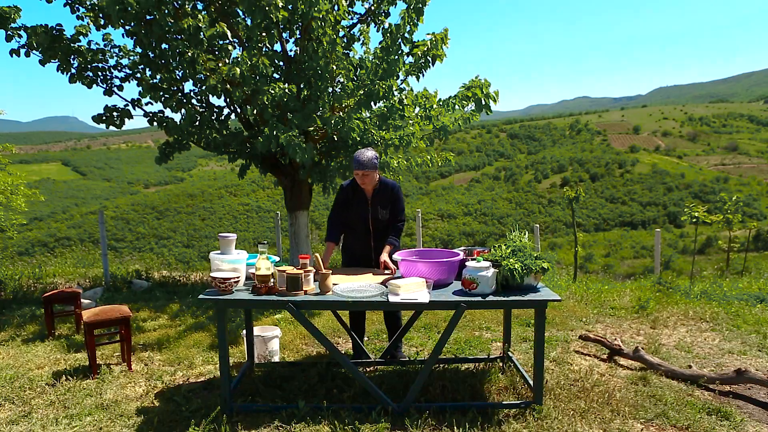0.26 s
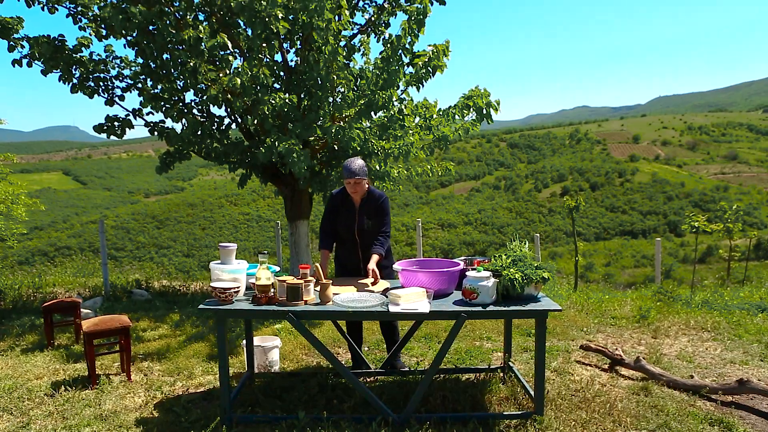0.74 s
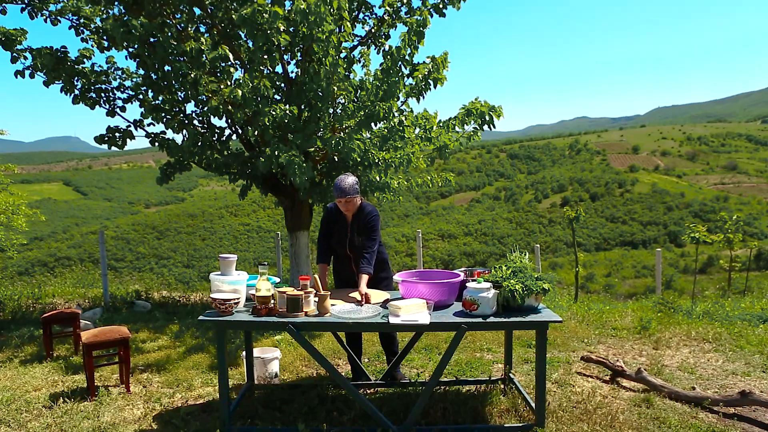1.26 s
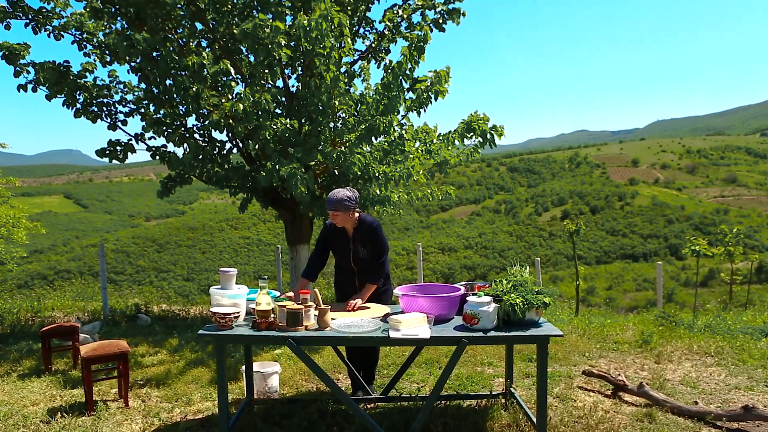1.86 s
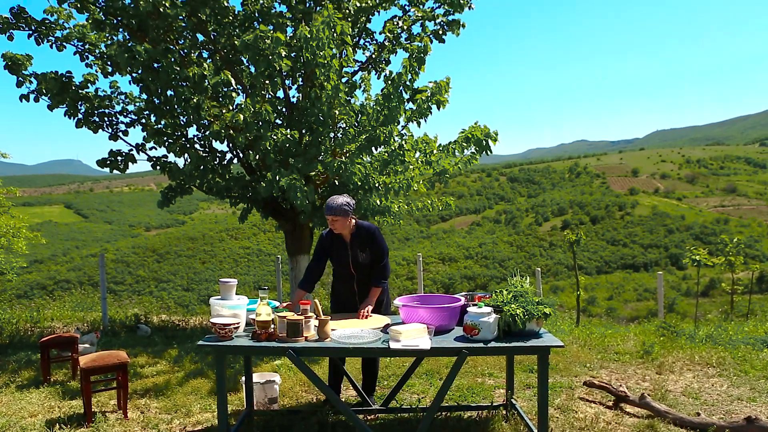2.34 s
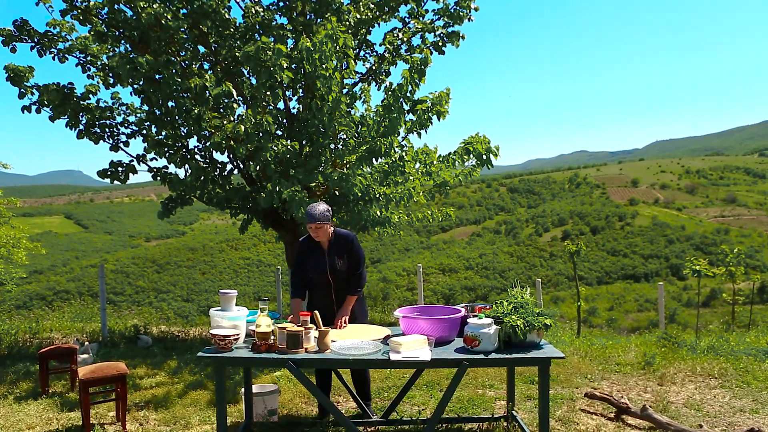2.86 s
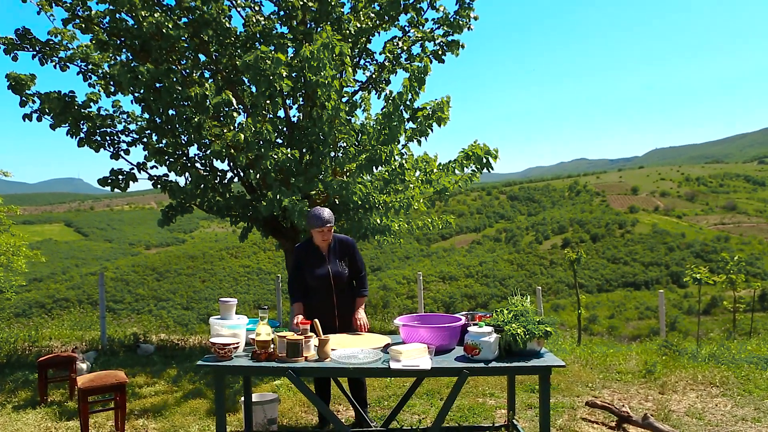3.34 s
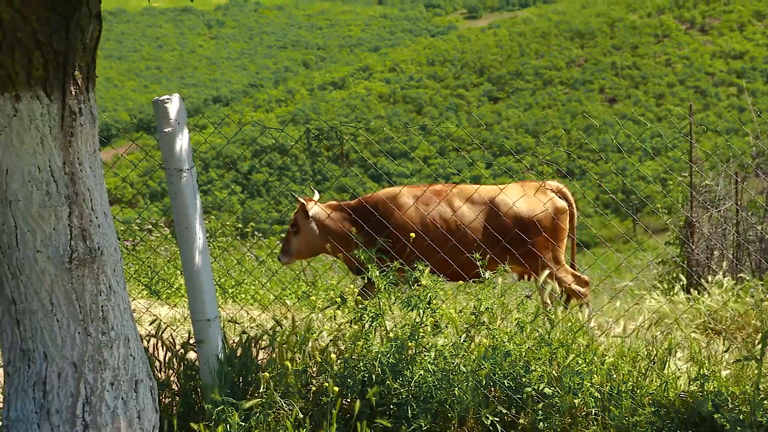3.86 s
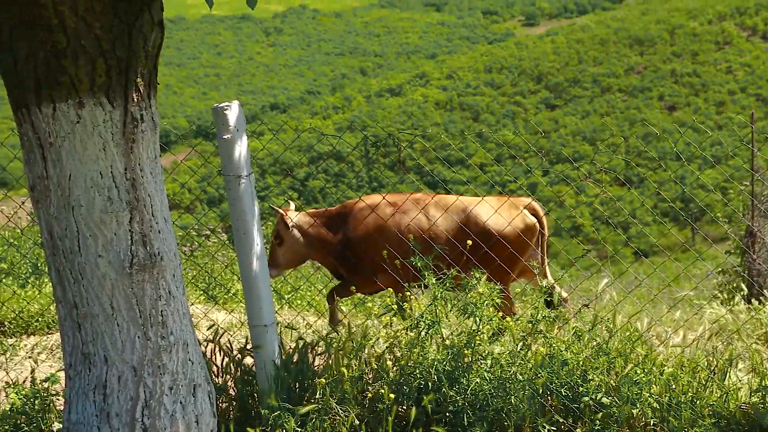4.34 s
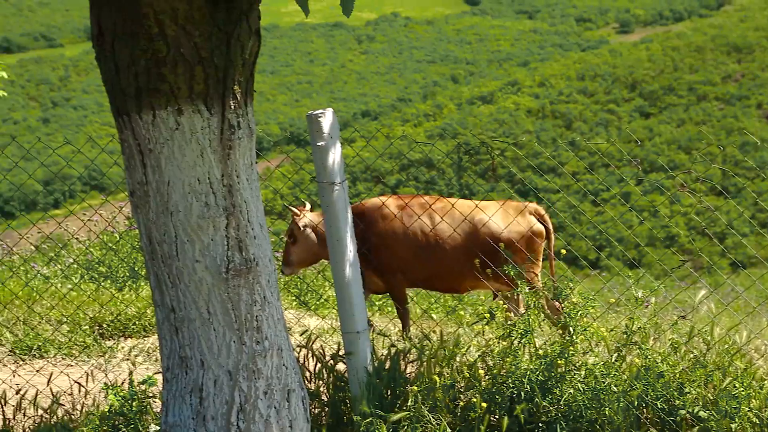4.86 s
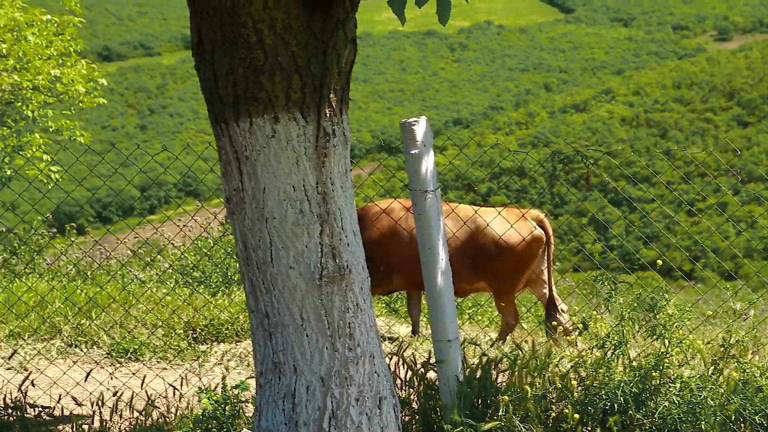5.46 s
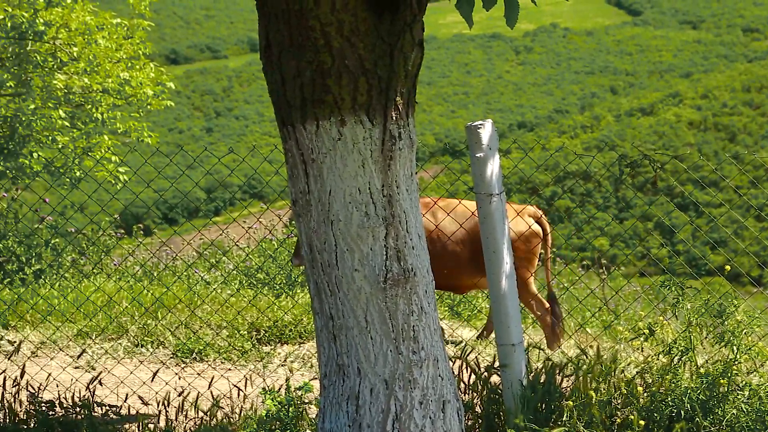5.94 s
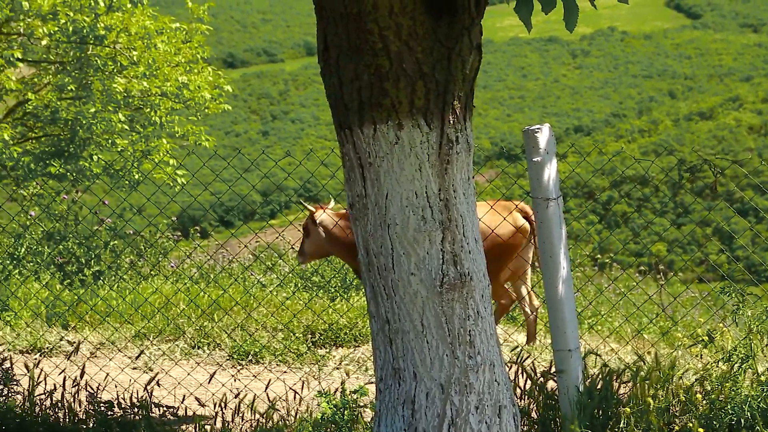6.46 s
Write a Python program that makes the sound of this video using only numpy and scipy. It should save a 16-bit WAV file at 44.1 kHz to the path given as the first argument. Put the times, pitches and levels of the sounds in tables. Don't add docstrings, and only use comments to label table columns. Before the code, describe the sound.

Strong wind buffets the microphone at first, thudding, crackling and popping, peaking just after two seconds. Beneath it are brief bird calls on the right, pulsing crickets, light table handling and two tiny water drips. As the air stills, left-hand whistles, quick warbled notes, thin high sweeps off leaves, a drifting bee and faint distant engine rumble emerge over soft valley hiss, with little echo in the open yard.

```python
import sys
import numpy as np
from scipy import signal
from scipy.fft import rfft, irfft, next_fast_len
from scipy.io import wavfile
from scipy.ndimage import uniform_filter1d, map_coordinates

SR = 44100
rng = np.random.default_rng(int(sys.argv[2]) if len(sys.argv) > 2 else 0)


def unload_audio(sound):
    columns = np.transpose(np.atleast_2d(sound))
    steps = np.round(np.clip(columns, -1, 1) * 32767)
    wavfile.write(sys.argv[1], SR, steps.astype(np.int16))


def invert_db(level):
    return 10 ** (np.asarray(level, dtype=float) / 20)


N = 295470

# pitch_hz [Hz], density_db [dB per Hz]
FLUTTER_SPECTRUM = [(120, -91), (220, 4), (350, -1), (600, -16), (1000, -32), (2000, -72)]


def unit(x):
    return x / np.sqrt(np.mean(x ** 2) + 1e-20)


def along(points, hz):
    f, v = np.transpose(points)
    return np.interp(np.log(hz + 1), np.log(f + 1), v)


def curves(rows):
    s, *cols = np.transpose(rows)
    return [np.interp(np.arange(N) / SR, s, c) for c in cols]


def wobble(rate):
    knots = rng.standard_normal(int(N * rate / SR) + 4)
    return map_coordinates(knots, [np.arange(N) * rate / SR])


def swells(rows, rise_db_s, fall_db_s):
    t = np.arange(N) / SR
    levels = []
    for s, hold, db in rows:
        before, after = np.maximum(s - t, 0), np.maximum(t - s - hold, 0)
        levels.append(db - rise_db_s * before - fall_db_s * after)
    return np.max(levels, axis=0)


def rush(spectrum, alike, lumps=1):
    m = next_fast_len(N + SR // 2)
    hz = np.fft.rfftfreq(m, 1 / SR)
    turn = np.arccos(np.clip(along(alike, hz), -1, 1)) / 2
    shape = invert_db(along(spectrum, hz)) * [np.cos(turn), np.sin(turn)]
    white = lumps * rng.standard_normal((2, N))
    mid, side = irfft(rfft(white, m) * shape, m)[:, :N]
    return unit(np.array([mid + side, mid - side]))


def placed(x, lead, pan_db, wet_db):
    # pitch_hz [Hz], t60_s [s]
    yard = [(1000, 0.2), (3000, 0.16), (7000, 0.14), (13000, 0.14)]
    m = next_fast_len(N + 64)
    ramp = np.exp(1j * np.pi * np.fft.rfftfreq(m) * lead * np.array([[1], [-1]]))
    direct = irfft(rfft(x, m) * ramp, m)[:, :N] * invert_db([[pan_db / 2], [-pan_db / 2]])
    hz, t, z = signal.stft(rng.standard_normal((2, SR // 2)), SR, nperseg=256)
    t60 = along(yard, hz)[:, None]
    trees = invert_db(-60 * t / t60)
    hillside = invert_db(-21 - 60 * t / (4.5 * t60))
    trunks = invert_db(1.6 * rng.standard_normal((2, 1, len(t))))
    tail = signal.istft(z * (trees + hillside) * trunks, SR, nperseg=256)[1]
    echoes = signal.fftconvolve(x[None], tail / np.linalg.norm(tail[0]), axes=1)[:, :N]
    return direct + invert_db(wet_db) * echoes


def gusts():
    # start_s [s], hold_s [s], level_db [dB]
    blows = [(0, 0.0014, -9.5), (.1, 0.11, -19), (.6, 0.028, -14), (.68, 0.48, -18), (1.08, 0.15, -15.5),
             (1.3, 0.21, -17.5), (1.48, 0.29, -17), (2.12, 0.19, -14), (2.36, 0.26, -27.5),
             (3.17, 0.065, -23.5), (3.52, 0.11, -24)]
    # time_s [s], level_db [dB]
    lull = [
        (0, -26.5),
        (2.9, -31),
        (3.4, -41.5),
        (5, -52),
    ]
    # start_s [s], level_db [dB]
    puffs = [(0.313, -15), (.47, -20.5), (2.428, -17), (2.579, -17), (2.837, -12), (3.01, -23),
             (3.051, -12.5), (3.25, -17), (3.68, -17)]
    # pitch_hz [Hz], density_db [dB per Hz]
    thud_spectrum = [(15, -40), (30, -9), (60, 1), (120, 4.5), (170, 3), (230, -4.5), (320, -23),
                     (500, -55)]
    thud_db = np.maximum(swells(blows, rise_db_s=328, fall_db_s=261), *curves(lull))
    thud_db = np.maximum(thud_db, swells([(s, 0, db) for s, db in puffs], 660, 660))
    flutter_db = -26.5 + 1.95 * (thud_db + 16.0)
    eddies = wobble(42)
    cracks = rng.random(N) < 170 / SR
    thud = rush(thud_spectrum, [(30, 0.21), (60, 0.8), (125, .99)], invert_db(2.3 * eddies))
    torn = invert_db(3.5 * eddies) * (0.055 + cracks)
    flutter = rush(FLUTTER_SPECTRUM, [(250, 1.0), (700, 0.97)], torn)
    return invert_db(thud_db) * thud + invert_db(flutter_db) * flutter


def pops():
    # start_s [s], peak_db [dB], pitch_hz [Hz]
    eddy_pops = [(0.051, 5, 167), (0.6, 5.5, 139), (0.629, 6.5, 209), (0.827, -6, 174), (0.929, 6.5, 169),
                 (1.028, 8, 125), (1.159, 8, 215), (1.291, 5, 123), (1.373, 5.5, 180), (1.529, 7, 165),
                 (1.689, -21, 183), (2.113, 7, 182), (2.189, 16.5, 158), (2.817, -16, 98), (3.046, -1, 114),
                 (3.666, -6, 86.1), (4.356, -19, 63.3), (4.419, -16, 61), (4.543, -8, 62.3)]
    out = np.zeros(N + SR)
    for s, db, hz in eddy_pops:
        u = np.arange(round(1.5 * SR / hz)) * hz / SR
        swing = np.sin(2 * np.pi * u) * np.sin(np.pi * u / 1.5)
        out[round(s * SR):][:len(u)] -= invert_db(db - 10.0) * swing
    return out[:N]


def slaps():
    # start_s [s], peak_db [dB]
    hits = [(0.093, -20.5), (0.172, -23.5), (0.353, -24.5), (0.589, -20.5), (0.63, -20), (0.706, -23),
            (0.743, -29), (0.787, -40), (0.836, -18.5), (0.888, -17.5), (0.936, -16), (1.027, -24),
            (1.07, -31), (1.107, -20.5), (1.137, -15), (1.294, -19), (1.373, -22.5), (1.438, -34),
            (1.478, -13), (1.57, -14.5), (1.623, -34), (1.703, -30), (1.758, -21.5), (2.119, -14.5),
            (2.188, -8.5), (2.275, -22.5), (2.326, -22), (2.385, -27), (2.425, -29), (2.577, -33),
            (2.835, -23.5), (3.049, -25), (3.243, -30), (3.602, -28.5)]
    push_s = .0006
    snaps = np.zeros(N + SR)
    u = np.arange(SR // 100) / SR / push_s
    for s, db in hits:
        snaps[round((s + .003) * SR):][:len(u)] += invert_db(db + 0.5) * u * (2 - u) * np.exp(-u)
    burst_db = -1 + swells([(s + 0.00394, 0, db) for s, db in hits], rise_db_s=3000, fall_db_s=602)
    return snaps[:N] + invert_db(burst_db) * rush(FLUTTER_SPECTRUM, [(500, 1)])


def wind():
    return gusts() + pops() + slaps()


def whistles(notes, edge, rough, hoarse=0.0029):
    out = np.zeros(N + SR)
    tremor = invert_db(rough * wobble(180))
    waver = np.pad(1 + hoarse * wobble(400), (0, SR))
    for note in notes:
        s, hz, db = np.transpose(note)
        t = np.arange(s[0] - edge, s[-1] + edge, 1 / SR)
        first = round(t[0] * SR)
        glide = uniform_filter1d(np.interp(t, s, hz), size=130, mode="nearest")
        pitch = glide * waver[first:][:len(t)]
        gate = np.clip(np.minimum(t - t[0], t[-1] - t) / (2 * edge), 0, 1) ** 2
        level = np.sqrt(2) * invert_db(np.interp(t, s, db)) * gate
        out[first:][:len(t)] += level * np.sin(2 * np.pi * np.cumsum(pitch) / SR)
    return out[:N] * tremor


def sung(shape, notes):
    t, hz, rel = np.transpose(shape)
    return [np.transpose([s + t * length / t[-1], hz * top_hz / hz.max(), db + rel])
            for s, db, top_hz, length in notes]


def glides(calls):
    return [[(s, from_hz, db), (s + length, to_hz, db)] for s, length, from_hz, to_hz, db in calls]


def trill(s, count, half, low_hz, high_hz, low_db, high_db):
    return [(s + k * half, (low_hz, high_hz)[k % 2], (low_db, high_db)[k % 2]) for k in range(count)]


def songbird():
    # time_s [s], pitch_hz [Hz], level_db [dB]
    DROP = [(0, 2964, -61), (.01, 2595, -8), (.035, 2227, 2), (.065, 1596, -9.5), (.105, 1380, -29)]
    LEAD = [(0, 2770, -26), (.016, 2830, -7.5), (.034, 3140, 0), (.041, 2760, -1.5), (.05, 2042, -6.5)]
    HOOK = [(0, 2326, -5), (.009, 3730, -9), (.013, 3845, 1), (.019, 3500, -3.5), (.033, 1832, -12.5)]
    PEAK = [(0, 1543, -18.5), (.016, 1902, -2.5), (.026, 2467, 1), (.037, 1964, -1.5), (.043, 1700, -28),
            (.06, 1370, -14)]
    DIP = [(0, 4550, -14), (.005, 4360, -3.5), (.01, 3740, -3), (.015, 3150, -3), (.022, 2930, -6),
           (.032, 2885, -3.5), (.045, 3080, -3.5), (.08, 3930, -3), (.092, 3740, -5.5)]
    arch_shape = [(0, 2850, 0), (.012, 3110, 1), (.028, 3286, -4), (.046, 3080, -3), (.062, 2776, -1.5),
                  (.078, 2400, -10)]
    rise_shape = [(0, 1533, -14.5), (.038, 2032, -0.5), (.075, 2157, 3), (.135, 2160, 3), (.17, 2102, -5)]
    # start_s [s], level_db [dB], top_hz [Hz], length_s [s]
    song = [
        (DROP, [(2.075, -22, 3000, 0.095)]),
        (LEAD, [(3.84, -17, 3120, 0.05), (3.977, -16, 3150, 0.048), (4.122, -23.5, 3180, .043)]),
        (HOOK, [(3.899, -18.5, 3790, 0.029), (4.034, -15.5, 3910, 0.034), (4.174, -17, 3803, 0.029)]),
        (PEAK, [(6.097, -25, 2484, 0.056), (6.365, -23.5, 2387, 0.064), (6.648, -25, 2275, 0.055)]),
        (DIP, [(6.226, -15, 4540, 0.09), (6.497, -16, 4605, 0.087)]),
    ]
    # start_s [s], level_db [dB], top_hz [Hz], length_s [s]
    buzzed = [
        (5.95, -19, 3306, 0.071),
    ]
    held = [
        (2.385, -30, 2098, 0.16),
        (2.73, -26, 2180, 0.17),
        (3.09, -28.5, 2132, .17),
        (3.475, -26.5, 2157, 0.17),
    ]
    shake = dict(s=5.928, count=5, half=0.0058, low_hz=2325, high_hz=3050, low_db=-26, high_db=-24)
    syllables = [note for shape, notes in song for note in sung(shape, notes)]
    warbled = whistles(syllables, edge=0.0025, rough=2.4, hoarse=.008)
    rasped = whistles(sung(arch_shape, buzzed) + [trill(**shake)], edge=0.00315, rough=2.4, hoarse=0.012)
    clear = whistles(sung(rise_shape, held), edge=.003, rough=.8)
    return (placed(warbled + rasped, lead=20.46, pan_db=1.0, wet_db=-4.5)
            + placed(clear, lead=19.8, pan_db=1.3, wet_db=-12))


def leaf_sweeps():
    # start_s [s], top_hz [Hz], bottom_hz [Hz], level_db [dB]
    falls = [(2.272, 12600, 6960, -29.5), (2.609, 12200, 6960, -31.5), (2.961, 12640, 6740, -32.5),
             (3.327, 13800, 6940, -33), (3.711, 13400, 7220, -33.5)]
    # time_s [s], share of the fall left [0-1], level_db [dB]
    fall_shape = [(0, 0.98, 3), (.006, .65, -7.5), (.012, 0.22, -8), (.018, .05, -3.5),
                  (.03, 0.0087, -13.5)]
    # start_s [s], length_s [s], from_hz
    # [Hz], to_hz [Hz], level_db [dB]
    sharp_calls = [(4.262, 0.013, 7140, 5700, -38.5), (5.83, 0.0065, 6900, 6490, -38),
                   (5.855, 0.014, 8600, 5100, -37), (6.217, 0.0066, 7000, 4400, -38),
                   (6.487, 0.0058, 6720, 4360, -39)]
    sweeps = [[(s + t, low + (top - low) * share, db + rel) for t, share, rel in fall_shape]
              for s, top, low, db in falls]
    high = whistles(sweeps + glides(sharp_calls), edge=0.0043, rough=2.05, hoarse=0.024)
    return placed(high, lead=15.3, pan_db=7.0, wet_db=10)


def right_bird():
    # start_s [s], length_s [s], from_hz [Hz], to_hz [Hz], level_db [dB]
    calls = [(.403, 0.0075, 4400, 6500, -25), (.413, 0.014, 5850, 6600, -31.5),
             (.425, 0.0078, 4840, 3170, -37), (.47, 0.017, 3470, 4760, -34),
             (1.087, 0.024, 5600, 6320, -31), (1.09, 0.024, 5100, 5890, -30.5),
             (1.205, 0.018, 6640, 6250, -35), (1.222, 0.021, 6360, 6850, -25),
             (1.243, 0.0244, 6780, 6100, -29.5), (1.267, 0.02, 6260, 6480, -28),
             (1.77, 0.024, 5550, 4960, -30.5), (3.455, 0.01, 5760, 6500, -40),
             (3.468, 0.029, 6600, 6070, -45)]
    chirped = whistles(glides(calls), edge=0.0029, rough=1.6, hoarse=.004)
    return placed(chirped, lead=-21.5, pan_db=-1.7, wet_db=-3)


def far_birds():
    # start_s [s], length_s [s], from_hz [Hz], to_hz [Hz], level_db [dB]
    far_calls = [(.55, .018, 3600, 3750, -46), (.645, .015, 3160, 3370, -40), (.65, .02, 2690, 2660, -46),
                 (.83, 0.11, 3640, 4260, -50), (1.07, 0.023, 1900, 1750, -44),
                 (1.15, 0.025, 3400, 3570, -56), (1.2, .02, 3600, 3800, -50), (1.215, .03, 2400, 2930, -47),
                 (1.245, 0.043, 2900, 2980, -45.5), (1.33, 0.026, 2100, 2750, -44),
                 (1.43, 0.041, 2680, 2950, -43.5), (1.545, .03, 2020, 2600, -50),
                 (1.65, 0.071, 2676, 3040, -46), (2.075, 0.011, 2840, 3200, -44),
                 (3.3, 0.042, 3160, 3250, -52), (3.425, .012, 2310, 2210, -41),
                 (4.64, 0.021, 2390, 2820, -41.5), (4.66, 0.029, 2760, 2300, -46),
                 (5.11, .04, 2280, 2790, -48)]
    piper_calls = [(4.62, .04, 3420, 3330, -55), (4.665, 0.027, 3300, 2985, -52),
                   (4.865, 0.055, 4014, 3930, -46), (5.145, 0.035, 3050, 3300, -51)]
    # time_s [s], pitch_hz [Hz], level_db [dB]
    upstroke = [(0, 2598, 6), (.012, 2916, -1.5), (.026, 3370, -9), (.044, 3877, 5)]
    pipe_shape = [(0, 3180, -8), (.03, 3294, -8), (.11, 3340, 1), (.122, 3250, 2), (.138, 2990, 0)]
    # start_s [s], level_db [dB], top_hz [Hz], length_s [s]
    warble = [
        (1.395, -44.5, 3980, 0.045),
        (1.468, -36, 4030, 0.043),
        (1.546, -39.5, 3976, .044),
        (1.626, -35.5, 4120, 0.035),
    ]
    piped = [
        (4.957, -43, 3350, .138),
    ]
    far_trill = dict(s=5.27, count=10, half=.013, low_hz=2500, high_hz=3600, low_db=-50, high_db=-54)
    blurred = whistles(glides(far_calls) + sung(upstroke, warble) + [trill(**far_trill)],
                       edge=0.0063, rough=3.7, hoarse=0.029)
    piper = whistles(sung(pipe_shape, piped) + glides(piper_calls), edge=0.0055, rough=1.2, hoarse=.003)
    return (placed(blurred, lead=9, pan_db=7.0, wet_db=4.0)
            + placed(piper, lead=18.3, pan_db=12.5, wet_db=-9))


def strokes(rows, top_hz, fall_hz, length):
    out, u = np.zeros(N + SR), np.linspace(0, 1, round(length * SR))
    for (s, db), (a, b) in zip(rows, rng.standard_normal((len(rows), 2))):
        pitch = top_hz * (1 + 0.01 * a) - fall_hz * u ** 2
        phase = 2 * np.pi * np.cumsum(pitch) / SR
        swell = np.sin(np.pi * u ** (1 + 0.17 * np.tanh(b)))
        tone = swell * (np.sin(phase) + invert_db(-27.5) * np.sin(2 * phase))
        out[round(s * SR) - len(u) // 2:][:len(u)] += invert_db(db) * tone
    return out[:N] * invert_db(1.24 * wobble(250))


def crickets():
    # first_s [s], last_s [s], peak_db [dB]
    chirp_rows = [(0.731, 0.787, -20.5), (0.899, 0.961, -20), (1.218, 1.303, -23.5), (1.36, 1.437, -21),
                  (1.55, 1.618, -20), (1.758, 1.85, -18.5), (1.938, 2, -21.5), (2.124, 2.185, -21),
                  (2.309, 2.362, -24), (2.521, 2.572, -25), (2.684, 2.737, -23), (2.863, 2.907, -21),
                  (3.029, 3.087, -19), (3.206, 3.262, -22), (3.389, 3.439, -22), (3.575, 3.629, -21.5),
                  (4.071, 4.128, -21), (4.212, 4.294, -20.5), (4.406, 4.463, -20.5), (4.576, 4.637, -22.5),
                  (4.779, 4.807, -22), (4.947, 5, -21.5), (5.121, 5.18, -20.5), (5.288, 5.351, -23),
                  (5.524, 5.579, -23.5), (5.718, 5.774, -21), (5.909, 5.965, -20.5), (6.096, 6.151, -21),
                  (6.371, 6.431, -18.5), (6.542, 6.599, -19)]
    # start_s [s], peak_db [dB]
    ticks = [(0.19, -30.5), (0.223, -29), (0.261, -26.5), (0.309, -25.5), (0.355, -26), (0.534, -30.5),
             (0.564, -25), (0.598, -22.5), (0.634, -24), (0.693, -25.5)]
    # pitch_hz [Hz], density_db [dB per Hz]
    chorus_spectrum = [(4000, -24.5), (4400, -2.5), (4750, 1), (5100, 4), (5400, -40), (5650, -40)]
    stroke_gap_s = .029
    chirps = []
    for first, last, db in chirp_rows:
        count = round((last - first) / stroke_gap_s) + 1
        for s in np.linspace(first, last, count):
            chirps.append((s, db - 3 * (s == first)))
    near = placed(strokes(chirps, 4950, fall_hz=470, length=.015), lead=4.31, pan_db=1.5, wet_db=-7.5)
    ticking = invert_db(2.0) * strokes(ticks, 5340, fall_hz=474, length=0.0174)
    ticker = placed(ticking, lead=0.89, pan_db=0.0, wet_db=-7)
    early_db = 3 * np.clip(1.3 - np.arange(N) / SR, 0, 1)
    chirping = invert_db(3.14 * wobble(60) + 0.2 * wobble(5.6) + early_db)
    chorus = invert_db([[-41], [-38]]) * rush(chorus_spectrum, [(5000, 0.17)], chirping)
    return near + ticker + chorus


def bee():
    # time_s [s], wing_beat_hz [Hz], level_db [dB]
    flight = [(2.52, 243.3, -77), (2.62, 233.6, -44.5), (2.77, 226.8, -43.5), (2.83, 228.5, -60),
              (2.93, 230, -43), (3.1, 222.6, -59), (3.3, 225.8, -45), (3.45, 222.8, -54),
              (3.55, 219.9, -48.5), (3.8, 221.9, -51), (4.2, 223, -62.5), (4.7, 226.7, -51.5),
              (4.95, 234.5, -59.5), (5.22, 250.4, -50.5), (5.35, 207.7, -50), (5.6, 230.7, -61),
              (5.76, 218.9, -45), (6.0, 219.9, -46.5), (6.2, 225, -61)]
    # time_s [s], level_db [dB]
    nearness = [
        (2.62, -2.5),
        (3.5, -11),
        (5.45, -26),
        (5.62, 5.5),
        (5.75, -11.5),
        (6.0, -34.5),
    ]
    # multiple of the beat, level_db [dB]
    wings = [(1, -2), (2, -2.5), (3, -16.5), (4, -10), (5, -12), (6, -17), (8, -11.5)]
    beat_hz, db = curves(flight)
    bright_db, = curves(nearness)
    unsteady = .009 - 0.0016 * np.minimum(bright_db, 0) * np.arange(N) / N
    phase = 2 * np.pi * np.cumsum(beat_hz * (1 + unsteady * wobble(40))) / SR
    stack = np.zeros(N)
    for k, level in wings:
        line_db = level + (k != 2) * bright_db + 3.5 * wobble(25)
        stack += invert_db(line_db) * np.sin(k * phase)
    return placed(invert_db(db + 4.0) * stack, lead=20.7, pan_db=15.5, wet_db=-4.5)


def handling():
    # start_s [s], hold_s [s], level_db [dB]
    moves = [(0, 0.0093, -49), (.17, 0.035, -40), (.27, 0.11, -44), (.4, 0.04, -37), (1.1, .05, -45),
             (1.17, 0.048, -36), (1.8, .01, -47)]
    # pitch_hz [Hz], density_db [dB per Hz]
    papery = [(500, -11.5), (900, -6), (2500, -11.5), (5000, -16.5), (9000, -25)]
    db = swells(moves, rise_db_s=246, fall_db_s=285)
    return invert_db(db) * rush(papery, [(1000, 1.0), (4000, 1.0)], invert_db(2.3 * wobble(150)))


def clicks():
    # start_s [s], peak_db [dB]
    knocks = [(.205, -20.5), (1.107, -27), (1.145, -25), (1.198, -29), (2.878, -23), (5.35, -42)]
    t60_s = 0.0058
    out, t = np.zeros(N + SR), np.arange(round(0.029 * SR)) / SR
    for s, peak_db in knocks:
        noise = uniform_filter1d(rng.standard_normal(len(t)), size=2)
        out[round(s * SR):][:len(t)] += invert_db(peak_db - 60 * t / t60_s) * noise
    return out[:N]


def drips():
    # start_s [s], pitch_hz [Hz], peak_db [dB]
    bubbles = [
        (1.135, 520, -34),
        (1.173, 562, -26),
    ]
    length_s, rise = 0.029, 0.89
    out, t = np.zeros(N + SR), np.arange(round(length_s * SR)) / SR
    for s, hz, peak_db in bubbles:
        pitch = hz * (1 + rise * (1 - np.exp(-4 * t / length_s)))
        phase = 2 * np.pi * np.cumsum(pitch) / SR
        out[round(s * SR):][:len(t)] += invert_db(peak_db) * np.sin(np.pi * t / length_s) * np.sin(phase)
    return out[:N]


def machines():
    # start_s [s], hold_s [s], level_db [dB]
    deep_passes = [(2.1, 1.4, -31.5)]
    hum_passes = [(1.9, .2, -55), (3.4, 0.11, -45), (4.5, 0.42, -47.5), (6.7, 0.095, -37.5)]
    pass_db_s = 7
    deep = rush([(15, -28), (30, -1), (50, -7.5), (70, 0.5), (100, -47)], [(40, 0.71)])
    hum = rush([(40, -52), (60, -7.0), (80, 7.0), (110, -21.0), (170, -45)], [(80, 1.0)])
    return (invert_db(swells(deep_passes, pass_db_s, pass_db_s)) * deep
            + invert_db(swells(hum_passes, pass_db_s, pass_db_s)) * hum)


def valley_air():
    # pitch_hz [Hz], density_db [dB per Hz]
    air_spectrum = [(25, -11), (86, -3), (272, -18.5), (441, -17), (774, -25.5), (1600, -28), (3120, -25.5),
                    (3770, -26.5), (5200, -17.5), (5700, -31.5), (6800, -31.5), (9380, -31.5),
                    (14000, -26.5), (15200, -33.5)]
    # pitch_hz [Hz], likeness [0-1]
    likeness = [(30, 0.75), (120, 0.57), (500, 0.44), (1400, 0), (15000, 0)]
    return invert_db(-37.5) * rush(air_spectrum, likeness) * invert_db([[.7], [-.7]])


def scene():
    birds = songbird() + leaf_sweeps() + right_bird() + far_birds()
    table = handling() + clicks() + drips()
    return wind() + birds + crickets() + bee() + table + machines() + valley_air()


def roll_off(x):
    return signal.sosfilt(signal.butter(12, 15200, fs=SR, output="sos"), x)


def record(dry):
    mix = dry / (1 + np.abs(dry) ** 4) ** (1 / 4)
    return roll_off(mix)


dry = scene()
out = record(dry)
unload_audio(out)
```